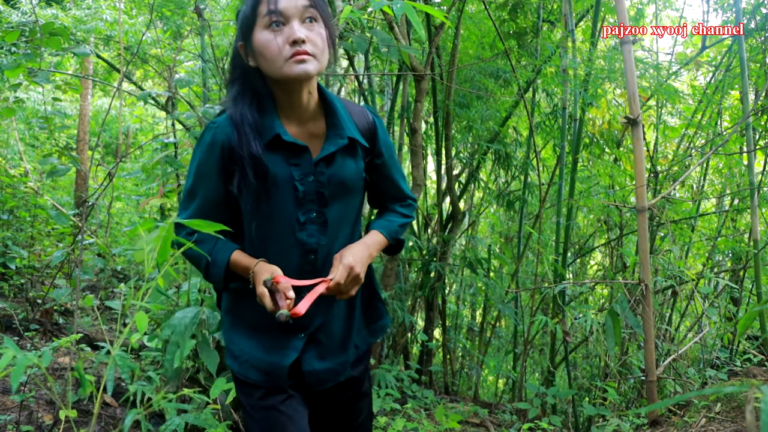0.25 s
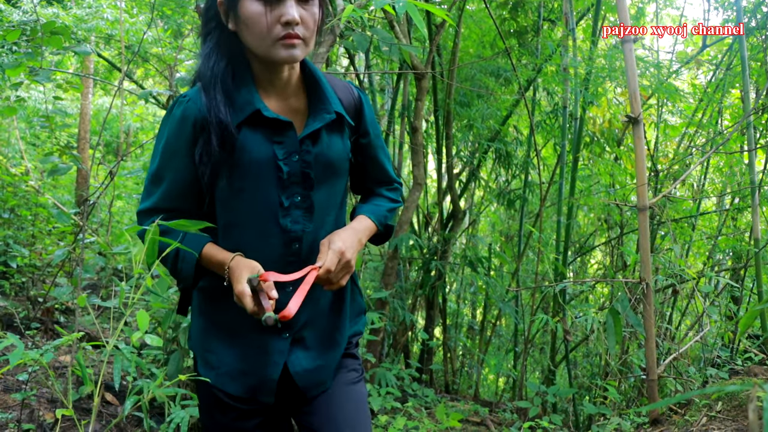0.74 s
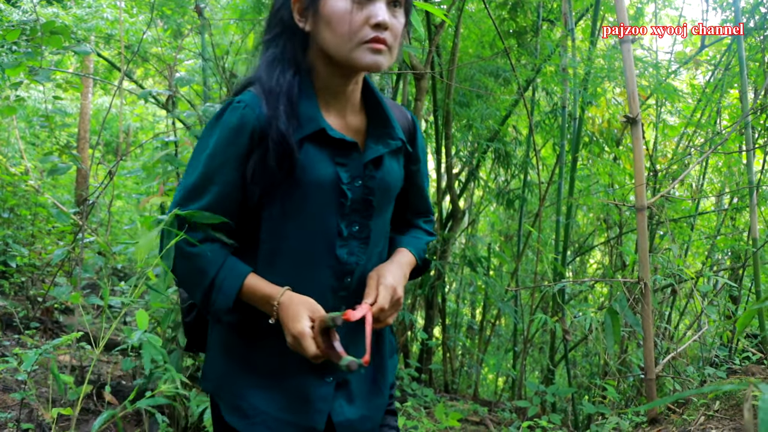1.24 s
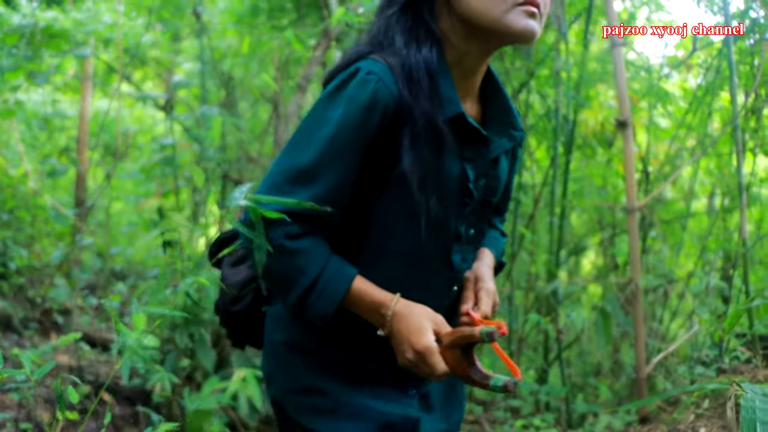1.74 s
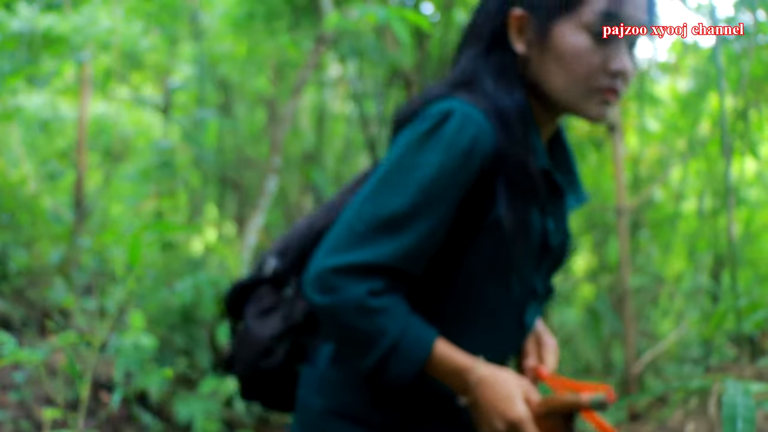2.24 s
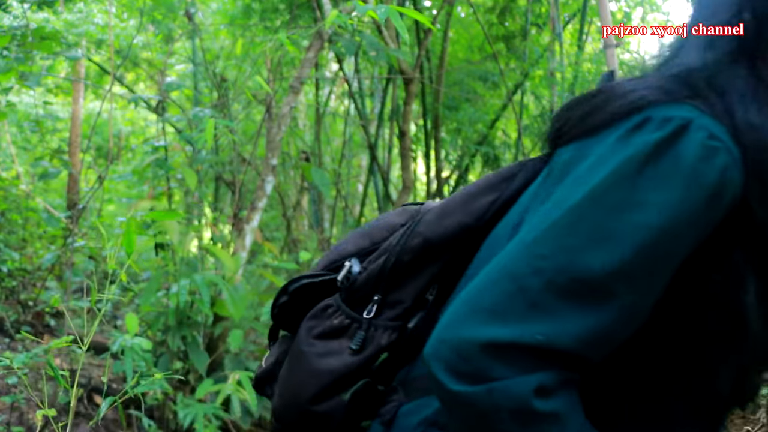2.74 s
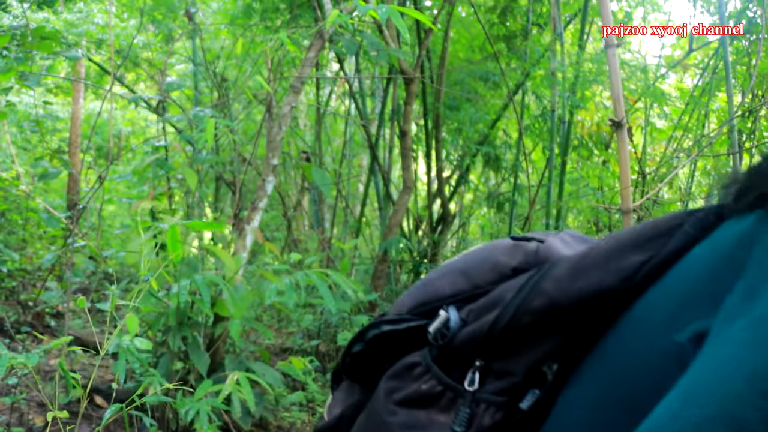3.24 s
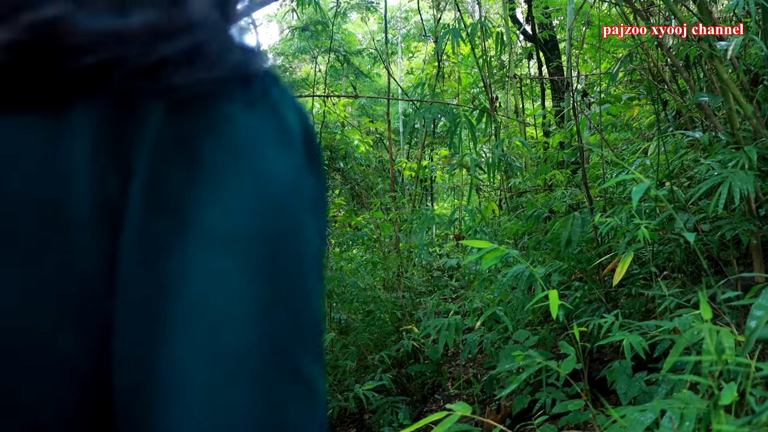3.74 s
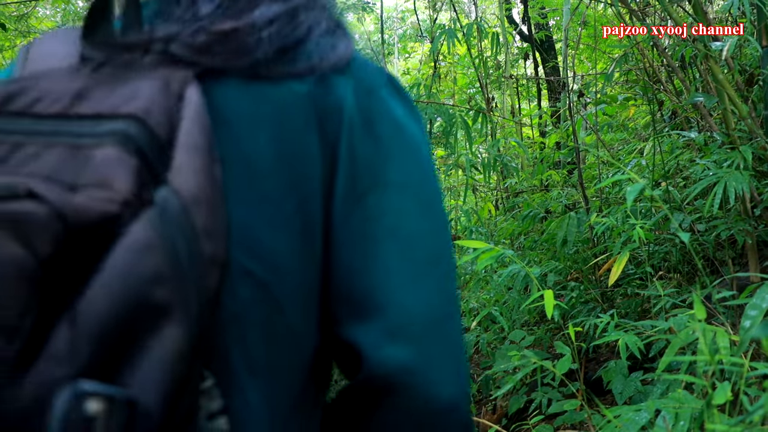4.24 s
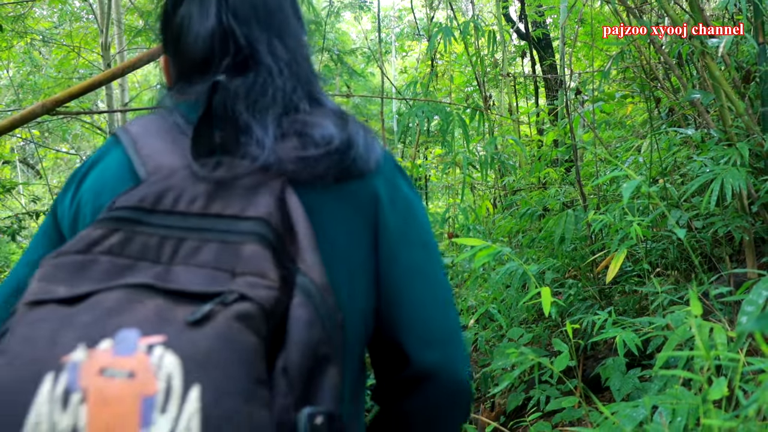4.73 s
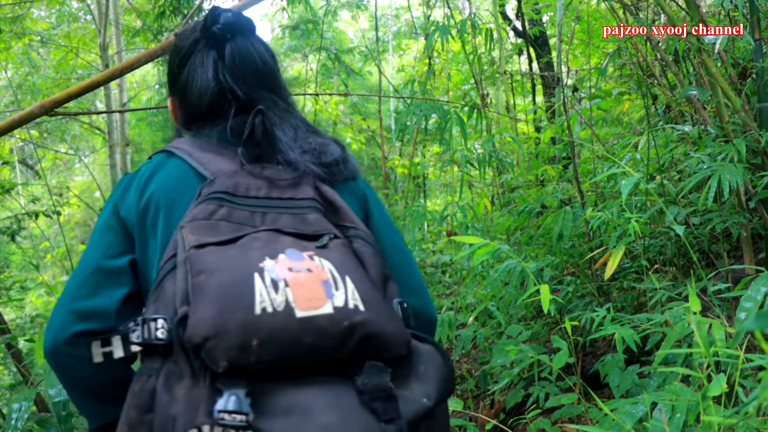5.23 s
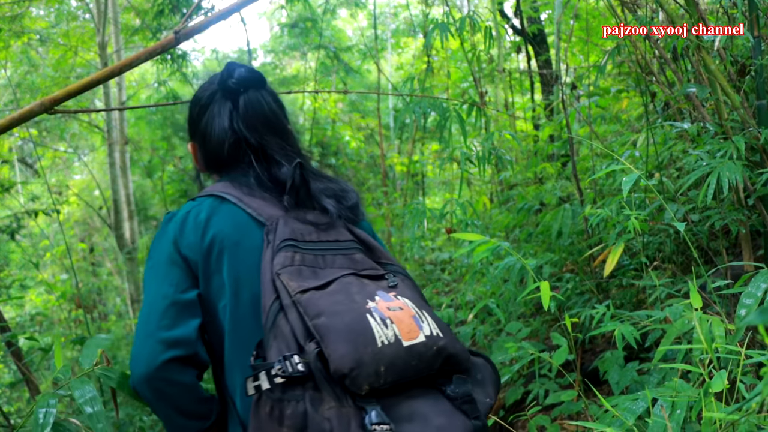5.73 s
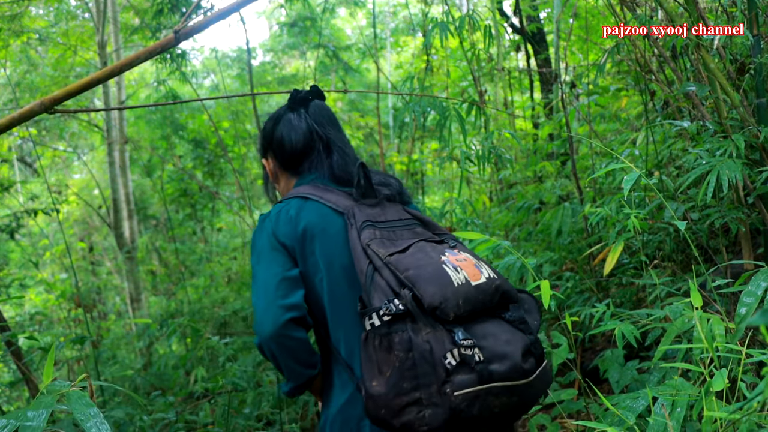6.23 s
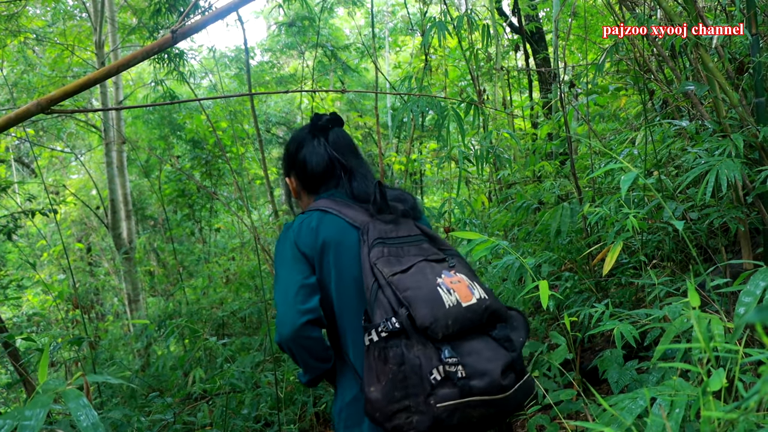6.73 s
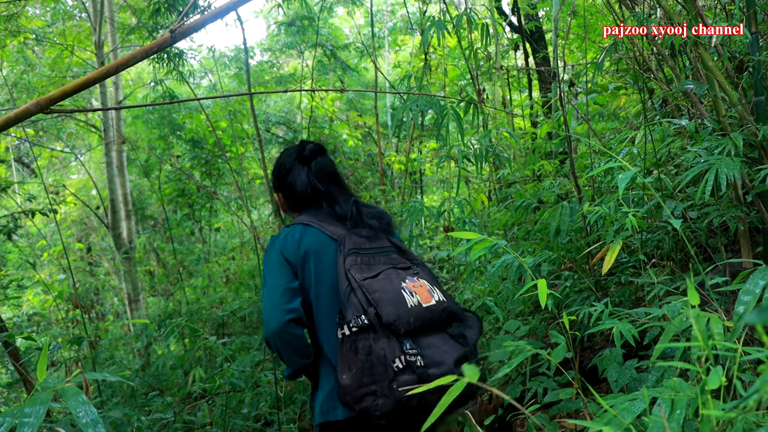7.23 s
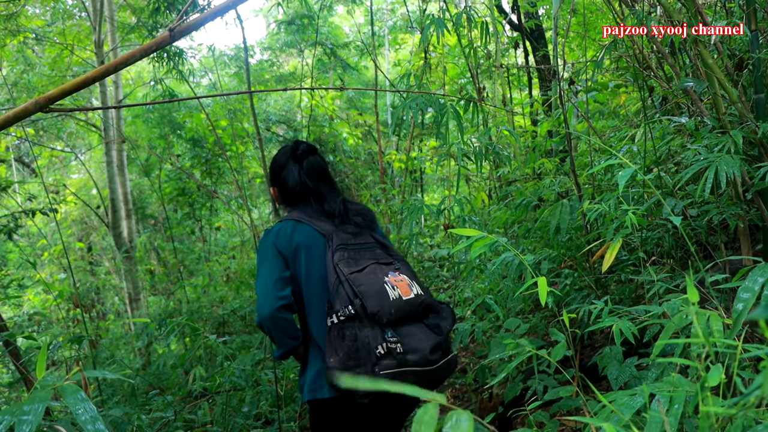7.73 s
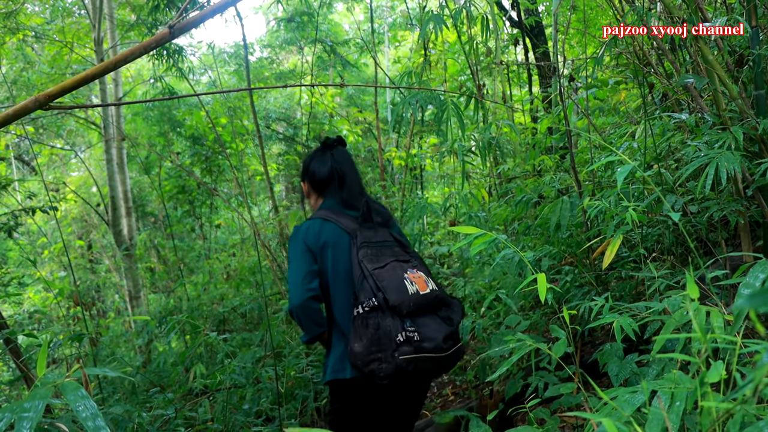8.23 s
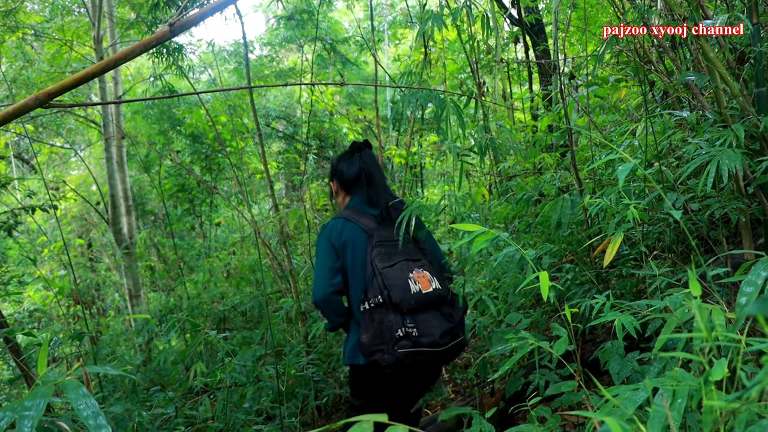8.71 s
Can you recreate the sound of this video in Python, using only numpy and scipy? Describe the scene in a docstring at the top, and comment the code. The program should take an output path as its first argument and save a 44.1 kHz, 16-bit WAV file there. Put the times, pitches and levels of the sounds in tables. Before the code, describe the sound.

A bright, nearly continuous cicada chorus around five to six kilohertz dominates throughout, gently pulsing, with a lower, fluttering insect throb swelling two to five times a second and a faint bed of air. From the start a nearby person stirs dry litter, with crisp twig snaps at 0.1 seconds and light rustles near 1. A soft low bird phrase rises far off at 1.2. Steps thicken from 1.7 to 2.3 with leafy hiss, crunches and snaps, then more cracks at 2.7 and hard snaps with dull thuds around 3.4. At 3.65 the level dips for milliseconds; the chorus returns altered in tone and side, with faint, very high katydid ticks. Movement is sparse from 4 to 5, then scattered brushes and small snaps continue, clearer at 7.3, 7.7 and 8.6. High bird chirps fall near 6, the low phrase repeats at 6.2, and both birds return faintly near 8.9.

```python
"""Cicadas and footsteps in a bamboo forest

A cicada chorus and a lower throbbing insect drone: noise shaped by steep resonances, with moving loudness.
Someone creeps through leaf litter: bursts of noise, tiny clicks, ringing snaps and dull low bumps.
Two distant birds whistle and faint hums come and go: gliding or wavering tones, over a bed of air noise.
The level dips briefly; then the chorus has another tone and balance, and katydids tick high above it."""
import sys
import numpy as np
from scipy import signal
from scipy.fft import rfft, irfft
from scipy.io import wavfile
from scipy.ndimage import uniform_filter1d

SR = 44100
rng = np.random.default_rng(int(sys.argv[2]) if len(sys.argv) > 2 else 0)


def to_wav(s):
    """Save 16-bit WAV."""
    ch = np.atleast_2d(s).T  # columns
    pcm = np.round(np.clip(ch, -1, 1) * 32767)  # PCM
    wavfile.write(sys.argv[1], SR, pcm.astype(np.int16))


N = 395577  # length in samples


def gain_of(db):
    """Turn decibels into an amplitude factor."""
    return 10 ** (np.asarray(db) / 20)


def evened(x):
    """Scale a signal to an rms (average strength) of 1."""
    return x / np.sqrt(np.mean(x ** 2) + 1e-20)


def times():
    """Time of every sample, in seconds."""
    return np.arange(N) / SR


def over_time(rows):
    """Draw straight lines between the rows of a table, giving each column at every sample."""
    s, *columns = np.transpose(rows)
    return [np.interp(times(), s, column) for column in columns]


def read(points, hz):
    """Read a curve over pitch, with the pitch axis stretched logarithmically as we hear it."""
    f, value = np.transpose(points)
    return np.interp(np.log(hz + 1), np.log(f + 1), value)


def ringing(modes, hz):
    """Gain of steep resonances whose powers add."""
    power = 0
    for f, width, db in modes:
        power = power + gain_of(2 * db) / (1 + (2 * (hz - f) / width) ** 2) ** 2
    return np.sqrt(power)


def sides(pan_db):
    """Left and right gains for a given left-minus-right difference."""
    return gain_of([pan_db / 2, -pan_db / 2])


def add(mix, s, sound):
    """Add a sound at time s, cutting off whatever runs past the end."""
    part = mix[:, round(s * SR):][:, :sound.shape[1]]
    part += sound[:, :part.shape[1]]


# how alike the left and right noise are: pitch_hz, likeness (1 = the same, 0 = unrelated)
LIKENESS = [(60, 0.58), (180, 0.73), (550, 0.49), (1650, -0.1), (4970, -0.021), (15000, -0.0024)]


def noise(gain, patchy_db, size=1024):
    """Random short-time spectra of rms 1 with drifting patches; the bass is the most alike in both channels."""
    frames, hz = 4 * N // size + 5, np.fft.rfftfreq(size, 1 / SR)
    a, b, c, d, patches = rng.standard_normal((frames, len(hz), 5)).T
    patches = uniform_filter1d(patches, size=10, axis=0)  # smooth over pitch
    patches = evened(uniform_filter1d(patches, size=8, axis=1))  # smooth over time
    same = np.clip(read(LIKENESS, hz), -1, 1)[:, None]
    left = a + 1j * b
    right = same * left + np.sqrt(1 - same ** 2) * (c + 1j * d)
    spectra = np.array([left, right]) * (gain(hz)[:, None] * gain_of(patchy_db * patches))
    return evened(signal.istft(spectra, nperseg=size, noverlap=3 * size // 4)[1][:, :N])


def forest(x, t60, wet_db):
    """Scattering adds a diffuse tail, different in each channel, that fades by 60 dB in t60 seconds."""
    t = np.arange(SR // 2) / SR
    tail = rng.standard_normal((2, len(t))) * gain_of(-60 * t / t60)
    tail = tail / np.linalg.norm(tail[0])
    return x + gain_of(wet_db) * signal.fftconvolve(x, tail, axes=1)[:, :N]


# colour of still air, far leaves and microphone hiss: pitch_hz, relative_level_db (per Hz)
AIR_COLOUR = [(25, -18), (60, -1.5), (110, 4.5), (250, 4), (350, 3), (500, 0), (1200, 0.5), (2000, -1.5),
              (2550, 1), (3200, -9.5), (6800, -22), (7700, -2.5), (9700, -9.5), (12500, -4), (15800, -34)]
AIR_DB = -54.5


def still_air():
    """A steady bed of coloured noise with soft drifting patches."""
    return gain_of(AIR_DB) * noise(lambda hz: gain_of(read(AIR_COLOUR, hz)), patchy_db=2.2, size=2048)


# faint low hums: start_s, length_s, pitch_hz, level_db
HUM_NOTES = [(1.5, 2.15, 352, -69), (7.5, 1.45, 131, -69), (8.3, .67, 336, -69)]


def hums():
    """Thin wavering tones with slow soft ends."""
    out = np.zeros((2, N))
    for s, length, hz, db in HUM_NOTES:
        drift = evened(uniform_filter1d(rng.standard_normal(3 * SR), size=8000))
        drift = drift[:round(length * SR)]
        tone = np.sin(2 * np.pi * np.cumsum(hz * (1 + .008 * drift)) / SR)
        tone = tone * signal.windows.tukey(len(drift), .3)
        add(out, s, np.tile(gain_of(db) * tone, (2, 1)))
    return out


GLIDE_BEND = 1.7  # above 1, a glide starts fast and levels off
LOUDEST_AT, START_DB, END_DB = .5, -4, -7  # share of the note where it peaks; level at its two ends
ECHO_S = .072


def birds(notes, pan_db, waver, echo_db, t60, wet_db):
    """Slightly unsteady gliding whistles with soft ends, an echo and the scatter of the trees."""
    out = np.zeros((2, N))
    for s, length, from_hz, to_hz, db in notes:
        u = np.linspace(0, 1, round(length * SR))  # progress through the note
        glide = to_hz + (from_hz - to_hz) * (1 - u) ** GLIDE_BEND
        wobble = evened(uniform_filter1d(rng.standard_normal(SR // 4), size=400))[:len(u)]
        pitch = glide * (1 + waver * wobble)
        tone = np.sin(2 * np.pi * np.cumsum(pitch) / SR) * signal.windows.tukey(len(u), .3)
        swell_db = np.interp(u, (0, LOUDEST_AT, 1), (START_DB, 0, END_DB))
        add(out, s, sides(pan_db)[:, None] * gain_of(db + swell_db) * tone)
    # a slope of the valley throws each note back once, with left and right swapped
    late = np.pad(out[::-1], ((0, 0), (round(ECHO_S * SR), 0)))[:, :N]
    return forest(out + gain_of(echo_db) * late, t60, wet_db)


# the low bird's phrase of three rising notes: delay_s, length_s, from_hz, to_hz, relative_level_db
PHRASE_NOTES = [(0, .15, 1030, 1395, -.5), (.18, .085, 1180, 1285, 2.5), (.35, .075, 1060, 1180, -1.5)]
# when the low bird sings it: start_s, level_db
PHRASE_STARTS = [(1.16, -50), (6.18, -49.5), (8.94, -50)]


def low_bird():
    """One short phrase of rising whistles, repeated from far off."""
    notes = []
    for s, level_db in PHRASE_STARTS:
        for delay, length, from_hz, to_hz, db in PHRASE_NOTES:
            if s + delay < N / SR:
                notes.append((s + delay, length, from_hz, to_hz, level_db + db))
    return birds(notes, 1.5, waver=.008, echo_db=-8, t60=.9, wet_db=4)


# the high bird: start_s, length_s, from_hz, to_hz, level_db
HIGH_NOTES = [(5.79, .05, 4150, 3700, -55), (5.848, .05, 3635, 3655, -50.5), (5.94, .03, 4150, 4130, -49),
              (5.995, .04, 4150, 4120, -47), (6.0, .225, 4000, 2810, -54), (8.735, 0.054, 3380, 3360, -57),
              (8.785, 0.036, 3700, 3400, -54), (8.84, 0.066, 3800, 3450, -55),
              (8.91, 0.065, 3750, 3350, -54)]


def high_bird():
    """Brief high whistles, heard mostly through the scatter of the trees."""
    return birds(HIGH_NOTES, 1.5, waver=.016, echo_db=-10, t60=.65, wet_db=9)


# wing strokes of two katydids: from_hz, to_hz, length_s, strokes_per_s, first_stroke_s
KATYDID_STROKES = [(11870, 11830, .018, 22.04, 3.668), (11600, 11340, .032, 22.23, 3.69)]
# their loudness, in the same order: level_db, left_minus_right_db
KATYDID_LEVELS = [(-58.5, -8), (-53, .1)]


def katydids():
    """Each wing stroke is a short falling tone, uneven in strength and timing."""
    out = np.zeros((2, N))
    for (from_hz, to_hz, length, rate, first), (db, pan_db) in zip(KATYDID_STROKES, KATYDID_LEVELS):
        hz = np.linspace(from_hz, to_hz, round(length * SR))
        stroke = np.sin(2 * np.pi * np.cumsum(hz) / SR) * np.hanning(len(hz))
        starts = np.arange(first, N / SR, 1 / rate)
        for s, (late, loud) in zip(starts, rng.standard_normal((200, 2))):
            gains = gain_of(db + 1.5 * loud) * sides(pan_db)[:, None]
            add(out, s + .002 * late, gains * stroke)
    return forest(out, t60=.12, wet_db=-3)


# dull bumps of a foot on the ground: start_s, level_db, rise_s
FOOT_THUDS = [(1.417, -45, 0.0023), (2.13, -53, 0.0054), (3.313, -50, 0.005), (3.371, -52, 0.0041),
              (3.41, -53, 0.0026), (3.675, -51.5, 0.016), (7.682, -49, 0.0049), (8.649, -65, 0.0049)]
# range of pitch in a bump: lowest_hz, highest_hz
THUD_BAND = (139, 563)


def thuds():
    """Short puffs of low noise, alike in both channels."""
    out, t = np.zeros((2, N)), np.arange(4000) / SR
    low = signal.butter(2, THUD_BAND, "band", fs=SR)
    for (s, db, rise), grit in zip(FOOT_THUDS, rng.standard_normal((len(FOOT_THUDS), len(t)))):
        puff = evened(signal.lfilter(*low, grit)) * t / rise * np.exp(1 - t / rise)
        add(out, s, gain_of(db) * np.tile(puff, (2, 1)))
    return out


def thin(x):
    """Small breaking things radiate little bass."""
    return signal.lfilter(*signal.butter(2, 320, "high", fs=SR), x)


def random_hits(per_s, spread_db):
    """Hits at random moments, a few much stronger than the rest."""
    size = gain_of(spread_db * np.minimum(rng.exponential(1, N), 4))
    return size * (rng.random(N) < per_s / SR)


def crackle(spectrum, per_s, spread_db, grain_s):
    """Noise of one colour, let through in short random bursts of very unequal size."""
    size = random_hits(per_s, spread_db)
    fade = np.exp(-np.arange(2000) / (grain_s * SR))
    power = signal.oaconvolve(size ** 2, fade)[:N]
    grains = noise(lambda hz: gain_of(read(spectrum, hz)), patchy_db=2.0, size=256)
    return evened(np.sqrt(abs(power)) * grains)


def litter(per_s, spread_db):
    """Tiny breaking stems: sharp clicks in 16 kinds, each with its own pitch, ring and side."""
    size = random_hits(per_s, spread_db)
    kind, t, out = rng.integers(0, 16, N), np.arange(400) / SR, np.zeros((2, N))
    pitches = np.geomspace(650, 4200, num=16)
    for k, (hz, (ring, side)) in enumerate(zip(pitches, rng.random((16, 2)))):
        click = np.sin(2 * np.pi * hz * t) * np.exp(-t * hz / (.5 + 1.56 * ring))
        clicks = signal.oaconvolve(size * (kind == k), click / np.linalg.norm(click))[:N]
        out += sides(12 * (side - .5))[:, None] * clicks
    return evened(forest(thin(out), t60=0.036, wet_db=-4))


# steps and brushes through the leaves: start_s, hold_s, hiss_level_db, crunch_level_db
LEAF_BRUSHES = [(0.091, 0.03, -48, -51.5), (0.917, .03, -51.5, -61), (0.99, 0.04, -53, -49),
                (1.247, 0.21, -71, -58), (1.69, 0.064, -46.5, -50), (1.786, 0.035, -48, -45),
                (1.91, 0.11, -48.5, -51), (2.064, 0.085, -45.5, -46), (2.2, 0.034, -42, -45.5),
                (2.656, 0.12, -60, -54), (2.823, 0.024, -52, -47.5), (3.25, 0.23, -51.5, -50),
                (3.657, 0.064, -49, -43.5), (4.023, .03, -54, -74.5), (5.417, .03, -66, -57),
                (5.686, 0.38, -56.5, -65), (6.53, 0.017, -49, -69), (6.657, 0.37, -55.5, -57),
                (6.968, 0.099, -52, -53.5), (7.314, 0.069, -48.5, -50.5), (7.686, 0.034, -53, -48.5),
                (7.79, .02, -54, -59), (8.594, 0.09, -49, -48.5)]
# quiet stirring between the brushes: time_s, hiss_level_db, crunch_level_db
QUIET_STIR = [(0, -64, -59), (.3, -60, -51), (.85, -76, -61), (1.5, -76, -55), (1.88, -54, -50),
              (2.3, -68, -52), (2.55, -65, -56), (3.1, -58, -50), (3.8, -66, -58), (4.3, -73, -55.5),
              (5.2, -63, -57), (6.3, -62, -54), (7.5, -57.5, -54.5), (8.2, -70, -59.5), (8.97, -66, -53)]
RISE_S, FALL_S = 0.017, 0.022  # time for a brush to grow or fade by a factor of e (about 2.7)


def movement():
    """Gains of hiss and crunch: each brush rises, holds and dies away over the quiet stirring."""
    t = np.arange(0, N, 64) / SR  # a coarse clock is enough
    brushes = 0
    for s, hold, hiss_db, crunch_db in LEAF_BRUSHES:
        edge = np.minimum((t - s) / RISE_S, (s + hold - t) / FALL_S)
        shape = np.exp(2 * np.minimum(0, edge))  # doubled, since powers add
        brushes = brushes + gain_of([[2 * hiss_db], [2 * crunch_db]]) * shape
    gains = []
    for power, stir_db in zip(brushes, over_time(QUIET_STIR)):
        gains.append(np.sqrt(np.interp(times(), t, power) + gain_of(2 * stir_db)))
    return gains


# colour of dry leaves hissing: pitch_hz, relative_level_db (per Hz)
HISS_COLOUR = [(2500, -42), (4000, -31), (7000, 5.5), (10000, 3.5), (12500, 6), (14000, -1.5), (15800, -27)]
# colour of the crunch underfoot: pitch_hz, relative_level_db (per Hz)
CRUNCH_COLOUR = [(60, -40), (150, -15), (300, -10.5), (900, 0), (1600, 3), (2500, 5.5), (4000, 8.5),
                 (6000, -5.5)]


def rustle():
    """Leaves hiss against cloth and crunch underfoot."""
    hiss_gain, crunch_gain = movement()
    hiss = crackle(HISS_COLOUR, per_s=1000, spread_db=3.8, grain_s=0.002)
    crunch = crackle(CRUNCH_COLOUR, per_s=440, spread_db=0.5, grain_s=0.0076)
    crunch = crunch + gain_of(-4.5) * litter(per_s=900, spread_db=3.5)
    return hiss_gain * hiss + crunch_gain * crunch


# twigs and dry leaves snapping, levels before shaping:
# start_s, body_level_db, body_pitch_hz, knock_level_db, crack_level_db, body_left_minus_right_db
TWIG_SNAPS = [(0.08, -33, 2820, -41, -41, -5), (0.092, -25.5, 2750, -58, -22, -2),
              (.703, -36, 2730, -61, -41, -6), (.888, -49, 3000, -58, -37, 0),
              (1.0015, -41, 3670, -61, -33, -7), (1.193, -36.5, 1970, -60, -45, -2),
              (1.419, -28.5, 3490, -40, -40, -13), (1.563, -29, 1900, -58, -37, -2),
              (1.39, -36, 3126, -56, -45, -1.5), (1.704, -41, 2370, -54, -36, .5),
              (1.739, -31, 1950, -60, -31, 0), (1.795, -27.5, 2400, -55, -33, -4),
              (1.82, -33, 2500, -50, -44, -4), (1.929, -23.5, 2530, -38, -28, 1),
              (1.977, -45, 3320, -44, -38, -2), (1.9912, -39, 1750, -41, -27, -1.5),
              (2.063, -45, 2000, -37, -36, 0), (2.099, -45, 2000, -34, -34, 0),
              (2.132, -26, 3630, -32, -29, 0), (2.145, -45, 2000, -31.5, -36, 0),
              (2.2044, -25, 7600, -55, -46, 4), (2.2058, -19.5, 8100, -50, -39, 4),
              (2.229, -31, 2470, -38, -37, -3), (2.255, -51, 2340, -33.5, -42, 2),
              (2.3135, -32.5, 3260, -37, -42, -14), (2.642, -26.5, 3770, -30.5, -25, -11),
              (2.6855, -41, 2820, -37, -18.5, -5), (2.816, -24, 2450, -43, -23, -7),
              (2.975, -35, 3380, -41, -46, -3.5), (3.357, -46, 3000, -55, -38, -3),
              (3.372, -19.5, 3200, -37, -14, -11), (3.414, -25.5, 2740, -53, -28, -9),
              (3.458, -25.5, 3270, -62, -40, -17), (3.613, -47, 3150, -37.5, -42, 1),
              (3.662, -31, 2580, -46, -36, 0), (3.669, -22.5, 1550, -55, -32, 1),
              (3.6859, -20, 2680, -56, -20, 6), (3.693, -26, 2640, -53, -26, -5),
              (3.6986, -20.5, 3070, -56, -30, 8), (3.71, -33, 2500, -53, -42, 0),
              (3.72, -31, 2800, -52, -34, 0), (4.327, -35, 3390, -39, -40, 7),
              (4.774, -33, 3350, -43, -31, -1.5), (4.914, -28.5, 3150, -51, -38, 0),
              (5.248, -31, 3690, -33.5, -46, .5), (5.289, -38, 3000, -46, -34, 2),
              (5.329, -37, 2500, -51, -37, 3), (5.452, -41, 3610, -41, -22, 2),
              (5.567, -33, 1840, -58, -51, 1), (5.593, -34, 1870, -47, -46, -5),
              (5.643, -32, 2530, -60, -37, -1.5), (5.739, -49, 3000, -58, -41, 1),
              (5.793, -37, 1730, -50, -31, -.5), (6.444, -41, 2700, -58, -45, 2),
              (6.521, -48, 3000, -58, -41, -4), (6.649, -32, 2420, -46, -44, -3),
              (6.69, -32.5, 1730, -49, -39, -1.5), (6.751, -35, 1530, -37, -39, -.5),
              (6.967, -44, 3030, -42, -38, 2), (7.197, -35, 3700, -37, -44, 12),
              (7.34, -31.5, 2320, -61, -25, -5), (7.362, -29, 3440, -54, -49, -.5),
              (7.3977, -35, 2800, -56, -32, 0), (7.409, -28.5, 2530, -65, -61, -7),
              (7.554, -35, 1740, -38.5, -40, 1), (7.602, -36, 3670, -58, -41, -1),
              (7.654, -54, 1840, -34, -44, -5), (7.685, -23, 2480, -51, -27, -12),
              (7.687, -26, 2550, -54, -45, -16), (7.797, -33.5, 2620, -62, -30, -3),
              (7.842, -50, 1740, -43, -47, 3), (8.5985, -45, 3000, -58, -34, 2),
              (8.613, -30.5, 2440, -49, -37, -3.5), (8.652, -31, 1730, -35, -42, -.5),
              (8.922, -34, 3550, -53, -52, -5)]
# a hard crack damps the body: crack_minus_body_db, ring_cycles
RING_LENGTHS = [(-26, 5), (-18, 2.4), (-8, 1.5), (4, 1.1)]
CRACK_PAN = 0.26  # share of the body's side that the crack keeps


def snaps():
    """Each snap is a few cycles of the twig's body, a dull knock on the ground and a sharp bright crack."""
    out, t = np.zeros((2, N)), np.arange(800) / SR
    bright = signal.butter(1, (1200, 11500), "band", fs=SR)
    knock = np.sin(2 * np.pi * 1020 * t) * np.exp(-t / .0011)
    crack_fade = .75 * np.exp(-t / .0003) + .14 * np.exp(-t / .0025)
    for row, grit in zip(TWIG_SNAPS, rng.standard_normal((len(TWIG_SNAPS), 2, len(t)))):
        s, db, hz, knock_db, crack_db, pan_db = row
        cycles = np.interp(crack_db - db, *np.transpose(RING_LENGTHS))
        rise = 1 - np.exp(-t * hz / (0.03 * cycles ** 2))
        body = np.sin(2 * np.pi * hz * t) * rise * np.exp(-t * hz / cycles)
        body = gain_of(db) * body * (1 + 0.16 * grit)  # roughened
        burst = (grit + 1.7 * (t == 0)) * crack_fade  # noise with a click at the start
        crack = gain_of(crack_db) * signal.lfilter(*bright, burst)
        snap = sides(pan_db)[:, None] * body + gain_of(knock_db) * knock
        add(out, s, snap + sides(CRACK_PAN * pan_db)[:, None] * crack)
    return forest(thin(out), t60=0.04, wet_db=-7.5)


# resonances of the lower insect: pitch_hz, width_hz, relative_level_db
THROB_MODES = [(4017, 310, 1), (4287, 400, 5), (4560, 250, 1.5), (4930, 360, -5.5)]
# buzzes of the near singers, before NEAR_DB is added: middle_s, level_db
NEAR_BUZZES = [(.09, -43), (.27, -43), (.44, -44), (.67, -44.5), (.81, -43.5), (1.0, -42.5), (1.2, -43),
               (1.38, -50), (1.62, -39.5), (1.97, -48), (2.37, -41), (2.73, -40.5), (3.12, -42),
               (3.48, -43.5), (4.03, -41), (4.52, -41.5), (4.92, -43.5), (5.38, -44), (5.8, -52),
               (6.02, -58), (6.42, -49), (6.67, -42.5), (6.83, -47), (7.12, -49), (7.52, -41),
               (7.83, -41.5), (8.32, -44), (8.7, -40.5), (8.92, -46)]
# loudness of the far singers: time_s, level_db
FAR_SINGERS = [(0, -49), (3.64, -47), (3.67, -47.5), (5.5, -47), (8.97, -47)]
BUZZ_S, NEAR_DB = .04, -1.5  # half width of a buzz (to 1/e of its power); loss on the way from the near singers
FLUTTER_DB, FLUTTER_S = 1.8, .011  # rms depth and half smoothing time of the irregular flutter


def throbber():
    """A broader, lower buzz: near singers swell a few times a second over far ones, all fluttering."""
    t = np.arange(0, N, 64) / SR
    near = 0
    for s, db in NEAR_BUZZES:
        near = near + gain_of(2 * (db + NEAR_DB)) * np.exp(-abs((t - s) / BUZZ_S) ** 1.4)
    power = gain_of(2 * over_time(FAR_SINGERS)[0]) + np.interp(times(), t, near)
    smooth = np.hanning(round(2 * FLUTTER_S * SR))
    flutter = evened(signal.oaconvolve(rng.standard_normal(N), smooth, "same"))
    buzz = noise(lambda hz: ringing(THROB_MODES, hz), patchy_db=1.4)
    return np.sqrt(power) * gain_of(FLUTTER_DB * flutter) * buzz


# drum membranes and their overtones: pitch_hz, width_hz, level_before_dip_db, level_after_dip_db (relative)
CICADA_MODES = [(5170, 280, -9, -9.5), (5384, 242, 3, 1.5), (5513, 98, 0, 0), (5645, 140, 2, 1),
                (5739, 84, 0.5, -1), (5854, 65, -8.5, -4), (5905, 45, -14, -8.5), (5965, 45, -11, -30),
                (6080, 60, -16.5, -15.5), (6090, 260, -23, -22), (6280, 55, -24, -21), (6350, 45, -23, -21),
                (6420, 120, -28, -27), (10790, 440, -24, -24), (10840, 63, -23, -22.5),
                (11280, 260, -21.5, -23.5)]
# loudness and side of the chorus: time_s, level_db, left_minus_right_db
CHORUS_LEVEL = [(0, -33.5, 2), (1.5, -33, 1.5), (2.5, -33.5, 2), (3.64, -33.5, 2.5), (3.67, -32.5, -2.5),
                (5, -33, 0.5), (7, -32.5, 0.5), (8.97, -32.5, -0.2)]
# the brief dip in level: middle_s, half_length_s, lowest_gain
LEVEL_DIP = (3.6555, .0045, .06)
PULSE_PER_S, PULSE_DB, PULSE_DRIFT = 22.1, .8, .012  # pulse rate, depth, and rms drift as a share of the rate


def cicadas():
    """So many drum clicks overlap that they merge into noise in the membrane resonances, gently pulsing."""
    level_db, pan_db = over_time(CHORUS_LEVEL)
    before_modes = [(f, width, before_db) for f, width, before_db, _ in CICADA_MODES]
    after_modes = [(f, width, after_db) for f, width, _, after_db in CICADA_MODES]
    before = noise(lambda hz: ringing(before_modes, hz), patchy_db=0.38, size=2048)
    after = noise(lambda hz: ringing(after_modes, hz), patchy_db=0.38, size=2048)
    # the nearest singers pulse together, with a tempo that drifts separately in each channel
    drift = evened(uniform_filter1d(rng.standard_normal((2, N)), size=20000))
    rate = PULSE_PER_S * (1 + PULSE_DRIFT * drift)
    pulse = np.sin(2 * np.pi * np.cumsum(rate, axis=1) / SR)
    drone = np.where(times() < LEVEL_DIP[0], before, after)
    return gain_of(level_db + PULSE_DB * pulse) * sides(pan_db) * drone


def scene():
    """Add all the sounds together, from the background to the chorus."""
    background = still_air() + hums() + low_bird() + high_bird() + katydids()
    walker = thuds() + rustle() + snaps()
    return background + walker + throbber() + cicadas()


# difference in colour between the channels: pitch_hz, left_minus_right_db
CHANNEL_COLOUR = [(300, .5), (1200, 1), (1900, -1.5), (2550, -4), (3400, 0), (4200, -0.5), (15000, 0.7)]
EDGE_HZ = 15740  # upper limit of the sound


def record(dry):
    """Dip the level briefly, colour left and right unequally and remove the highest treble."""
    s, half, lowest = LEVEL_DIP
    dipped = dry * np.clip(abs(times() - s) / half, lowest, 1)
    balance = sides(read(CHANNEL_COLOUR, np.fft.rfftfreq(N, 1 / SR)))
    coloured = irfft(rfft(dipped) * balance, N)
    low_pass = signal.firwin(1023, EDGE_HZ, window=("kaiser", 9), fs=SR)
    return signal.oaconvolve(coloured, low_pass[None], "same")


dry = scene()
out = record(dry)
to_wav(out)
```